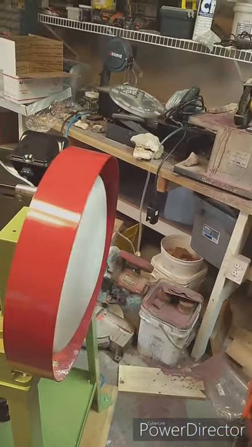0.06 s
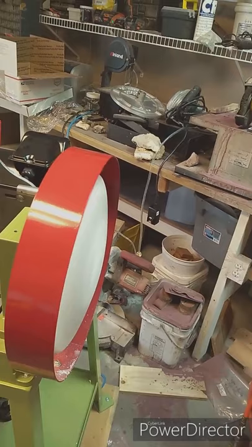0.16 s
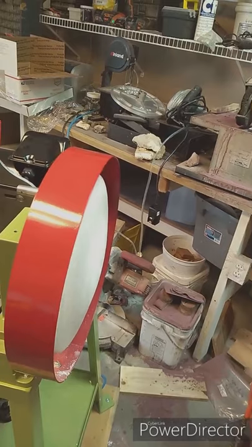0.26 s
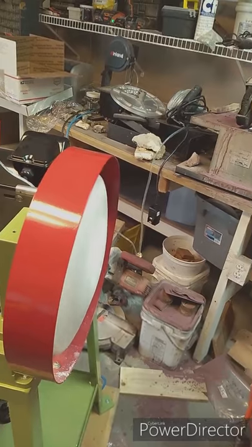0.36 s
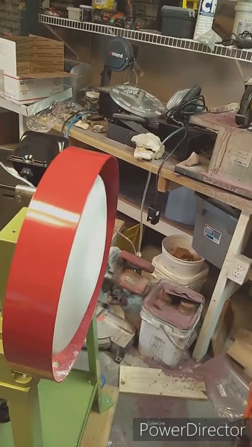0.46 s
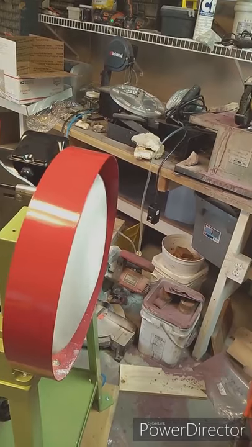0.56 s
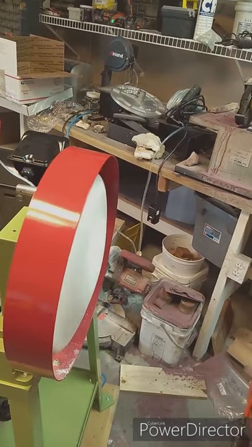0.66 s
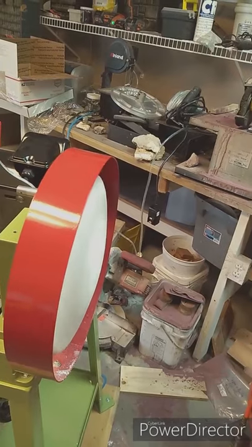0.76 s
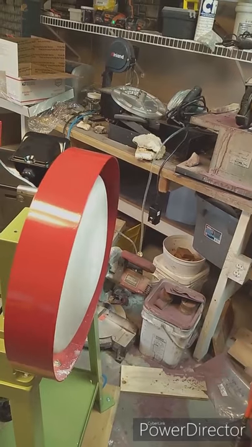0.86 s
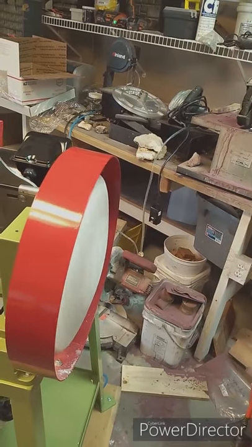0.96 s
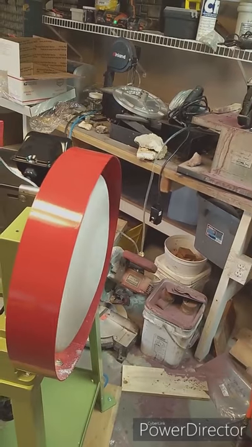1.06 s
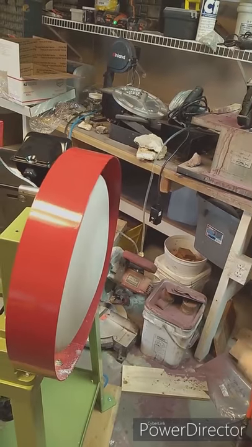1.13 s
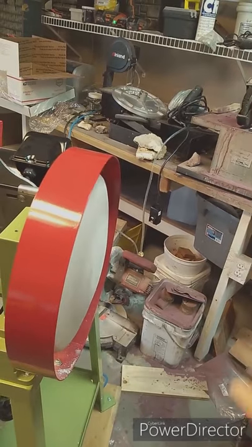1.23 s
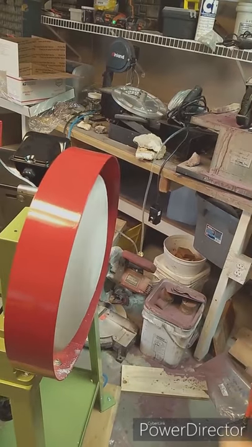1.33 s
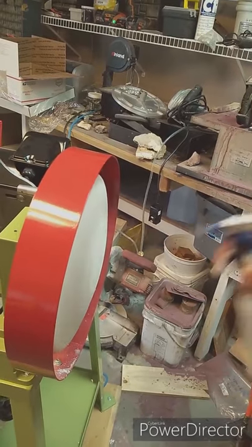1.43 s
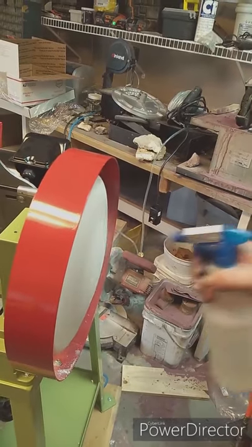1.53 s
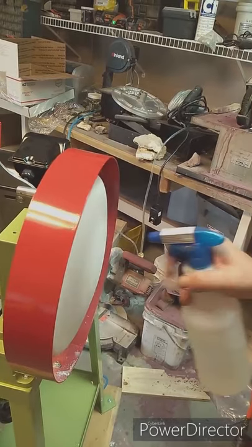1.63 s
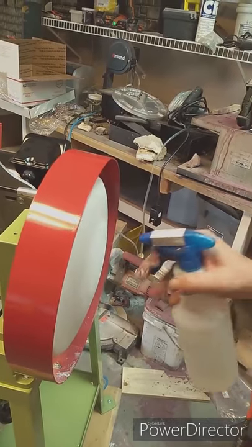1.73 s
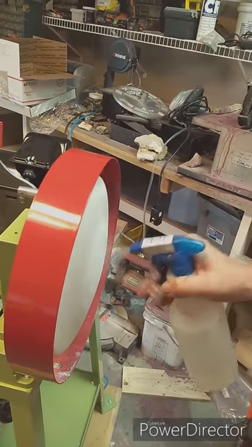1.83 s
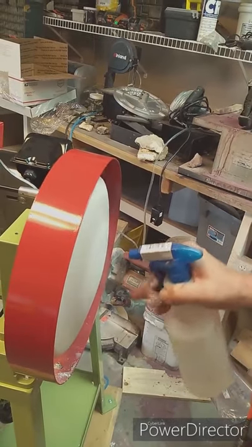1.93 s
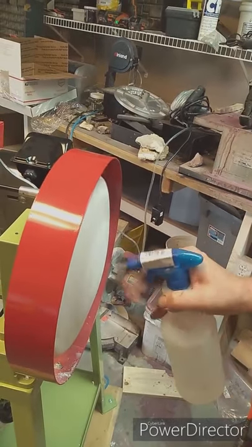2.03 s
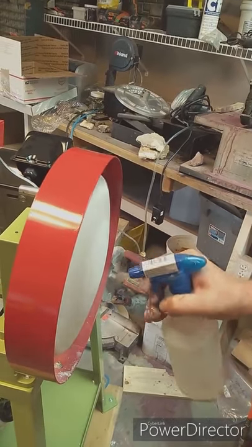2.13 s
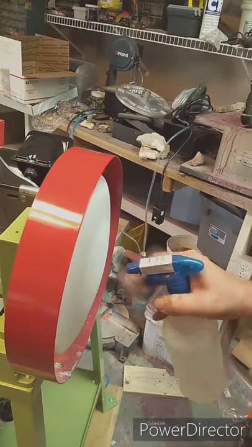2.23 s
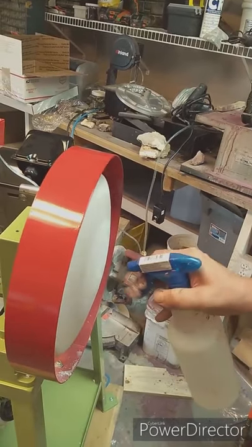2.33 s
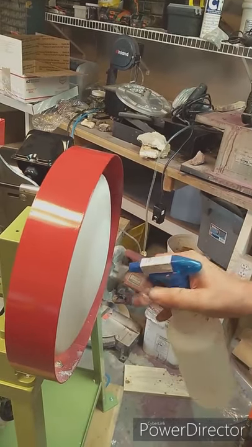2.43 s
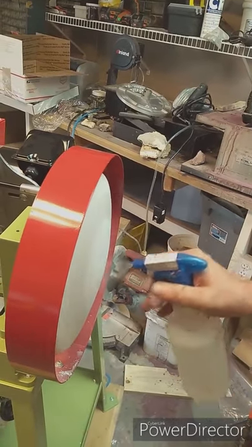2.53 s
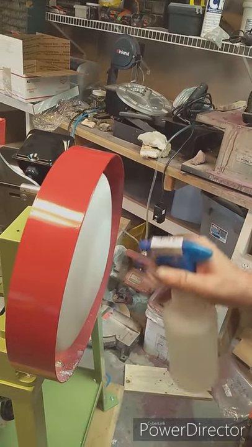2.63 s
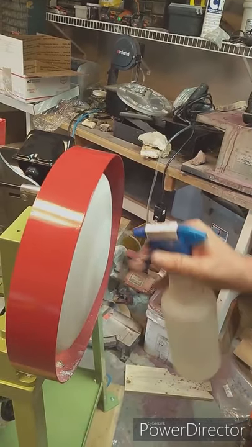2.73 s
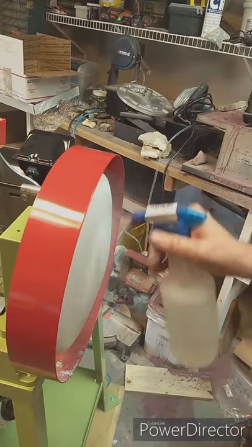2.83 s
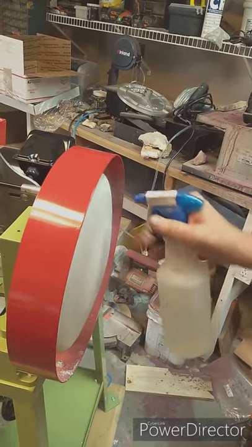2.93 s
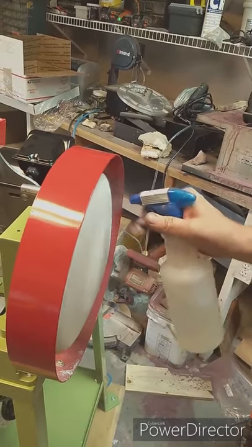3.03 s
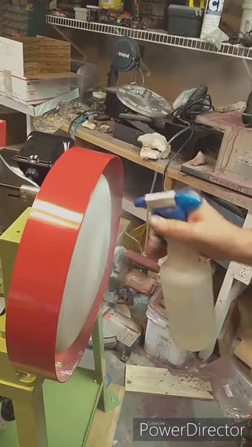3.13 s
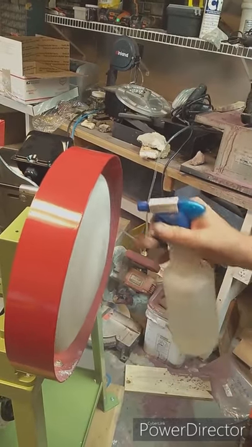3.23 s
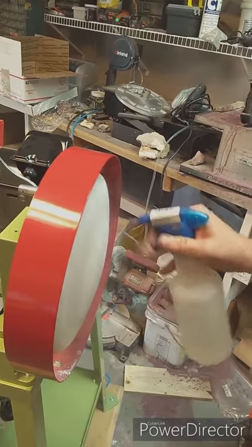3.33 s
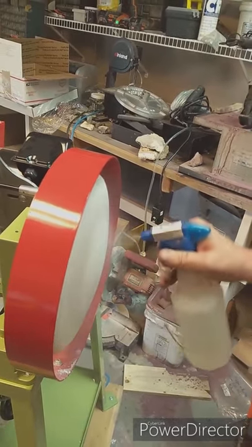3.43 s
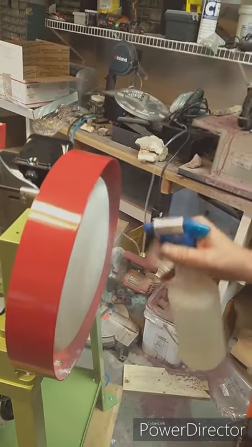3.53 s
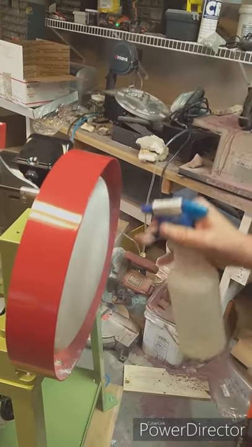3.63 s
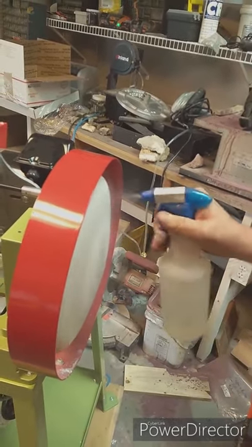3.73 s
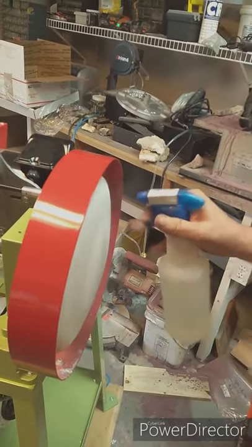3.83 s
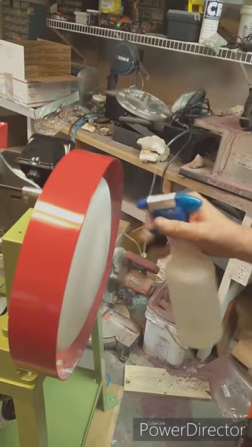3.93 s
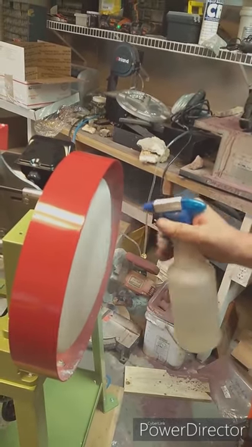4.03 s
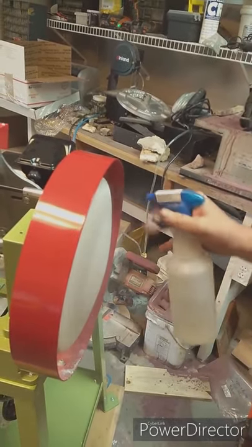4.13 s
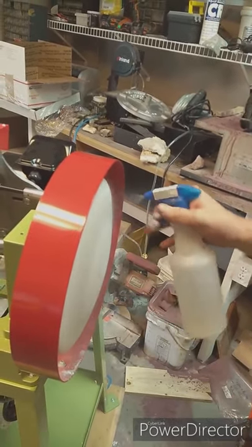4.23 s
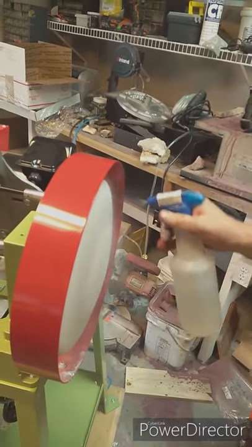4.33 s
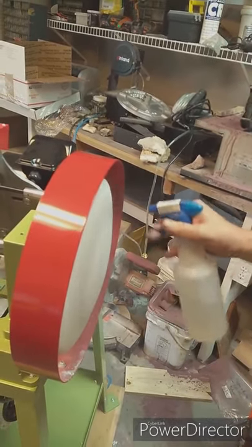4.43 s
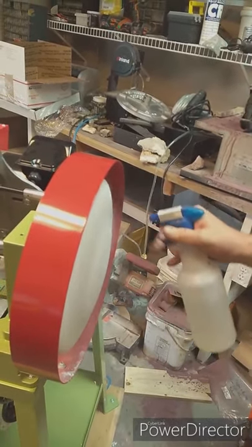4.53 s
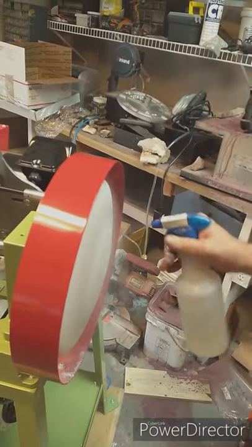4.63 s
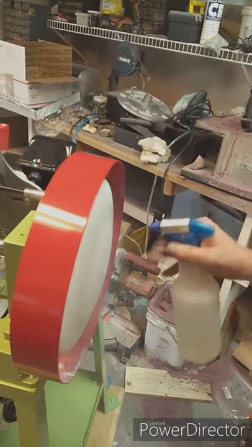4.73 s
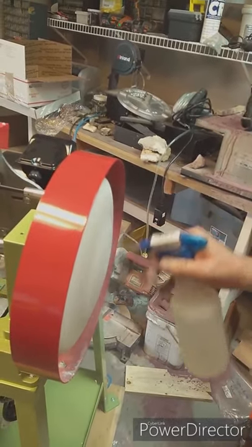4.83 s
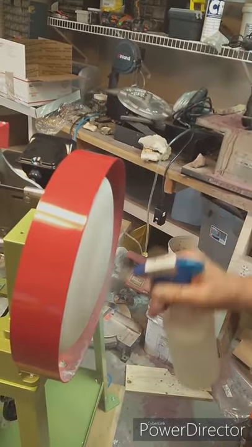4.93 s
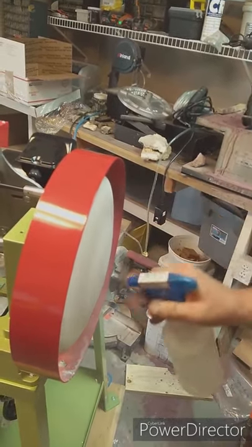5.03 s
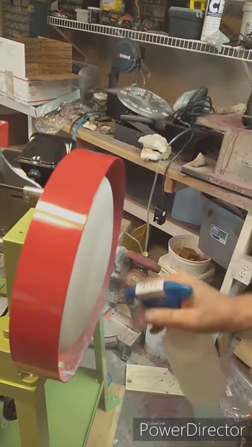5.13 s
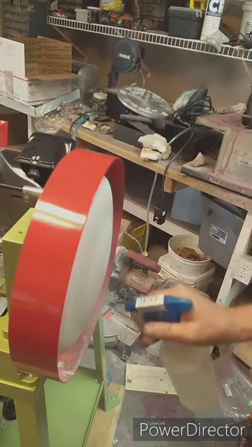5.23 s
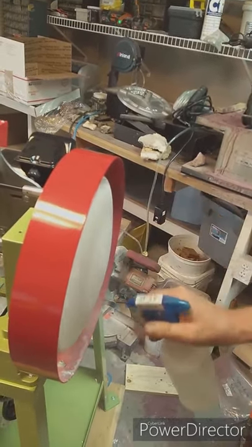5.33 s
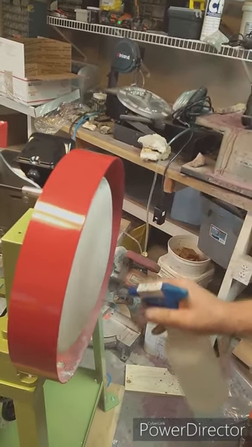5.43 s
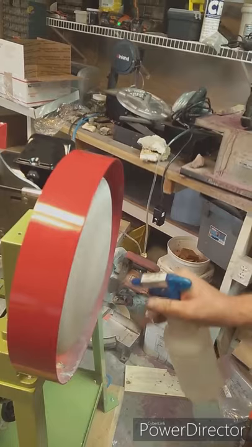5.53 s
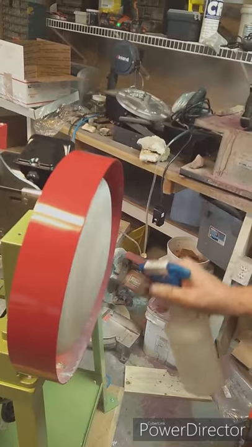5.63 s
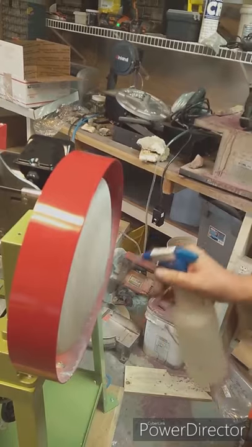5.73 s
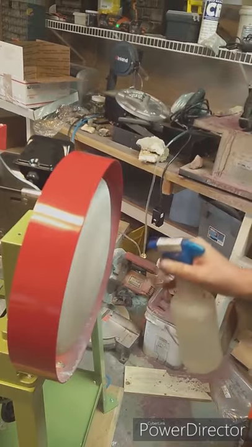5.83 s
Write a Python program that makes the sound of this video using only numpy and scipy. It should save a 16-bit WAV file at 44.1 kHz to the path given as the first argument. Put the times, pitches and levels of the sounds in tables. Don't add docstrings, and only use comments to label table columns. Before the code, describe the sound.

In a workshop, a small motor hums low and knocks softly about eleven times a second throughout. First come faint liquid sloshes and plastic rustles as a bottle is picked up; from 1.5 seconds the trigger is pumped about three times a second, each click swelling into a sharp hiss. Close stereo camera microphone, slightly grainy compressed sound.

```python
import sys
import numpy as np
from scipy import signal
from scipy.fft import rfft, irfft, dct, next_fast_len
from scipy.io import wavfile
from scipy.ndimage import uniform_filter1d, map_coordinates

SR = 44100
rng = np.random.default_rng(int(sys.argv[2]) if len(sys.argv) > 2 else 0)


def int16_out(signal):
    q = np.round(np.clip(np.atleast_2d(signal).T, -1, 1) * 32767)
    wavfile.write(sys.argv[1], SR, q.astype(np.int16))


def decibels_to_gain(level_db):
    exponent = np.asarray(level_db, float) / 20
    return 10 ** exponent


N = 258867

# (valve opens [s], time to full pressure [s], full jet [dB], opening under that [dB],
# time to lose 20 dB [s])
SQUIRTS = [(1.479, .082, -33, 25, .1), (1.845, 0.069, -31, 12, 0.06), (2.108, .118, -33, 4, .075),
           (2.525, 0.059, -36, 12.5, 0.12), (2.785, 0.079, -30.5, 12.5, .13), (3.098, .078, -32.5, 4, 0.12),
           (3.379, 0.104, -33, 20, 0.1), (3.7, 0.096, -32, 20, 0.08), (3.975, 0.102, -32.5, 12.5, 0.11),
           (4.27, 0.114, -35.5, 21.5, 0.07), (4.571, 0.113, -34.5, 23.5, 0.08),
           (4.872, 0.101, -34, 27.5, .11), (5.169, .103, -32, 18, 0.09), (5.455, 0.104, -39.5, 18, 0.11),
           (5.729, .069, -40.5, 9, 0.24)]
# (seep starts [s], seep [dB], its jet part re that [dB],
# sputter re usual [dB], mist re usual [dB])
LEADS = [(1.45, -67, 0, 0, -1), (1.796, -64, 0, 0, 1), (2.1, -60, 0, 0, 0), (2.499, -61, 0, -2, 0),
         (2.774, -62, 0, -2, 0), (3.075, -57, 0, -2, 1), (3.375, -80, 0, -4, -1), (3.674, -58, 0, -2, 0),
         (3.97, -80, 0, -4, 0), (4.249, -62, 0, 0, 0), (4.566, -80, 0, -2, 1), (4.868, -80, 0, 4, 0),
         (5.147, -63, 0, 0, 1), (5.444, -63, 0, 0, -1), (5.724, -80, 0, -4, 1.5)]
# (time [s], peak [dB])
TICKS = [(0.347, -52), (0.8804, -56), (1.438, -54), (2.076, -38), (2.09, -38), (2.742, -43), (3.0789, -45),
         (3.698, -47), (3.978, -46), (3.998, -38), (4.2516, -49), (4.269, -34), (4.8724, -47), (5.455, -45),
         (5.4675, -38)]
# (middle [s], length [s], level [dB], fizz re that [dB])
GURGLES = [(1.45, .04, -68, 4), (1.577, 0.072, -53, -22), (1.841, 0.046, -57, 4.5), (2.06, .09, -59, 10),
           (2.345, .09, -58, 6), (2.45, .08, -63, 3), (2.736, 0.037, -59.5, 0.5),
           (2.863, 0.061, -49.5, -20), (3.115, 0.049, -56.5, -19.5), (3.408, 0.054, -60, -20),
           (3.653, 0.18, -57, -8), (3.92, .08, -66, 4), (4.044, 0.099, -56, -19.5), (4.47, .08, -62, 6),
           (4.55, 0.14, -57.5, -8), (4.683, 0.096, -56, -19.5), (4.8, .07, -60, 4),
           (5.106, 0.05, -67.5, 12.5), (5.196, 0.056, -57.5, -20), (5.294, 0.13, -53.5, -20),
           (5.435, 0.15, -61, -3.5), (5.696, 0.13, -58.5, -8), (5.75, .06, -55, -19)]
# (frequency [Hz], density [dB per Hz])
JET_COLOUR = [(3800, -38), (4600, -23.5), (5000, -5), (6800, -4), (8200, 0), (9200, -5), (10800, -3.5),
              (11100, -24), (11800, -32), (12400, -53)]
# (frequency [Hz], density [dB per Hz])
MIST_COLOUR = [(10600, -37), (11300, -12.5), (12200, -10), (12800, -4.5), (14500, -5), (14900, -5.5),
               (15750, -16), (16000, -72)]
# (frequency [Hz], density [dB per Hz])
DROPS_COLOUR = [(1200, -10.5), (2000, -5), (3000, 4.5), (3600, 3), (4600, -0.5), (5200, -53)]
# (from [s], to [s], band of 375 Hz [number], level re jet [dB])
THIN_TONES = [
    (2.8, 3.06, 40, -16),
    (3.1, 3.35, 40, -16),
    (3.4, 3.52, 40, -17),
    (2.26, 2.33, 40, -13),
    (2.8, 3.06, 30, -21),
    (2.52, 2.7, 30, -23),
    (3.82, 3.92, 40, -13),
    (2.6, 2.7, 32, -22),
]
# (time [s], peak [dB], wall pitch [Hz], rattle re peak [dB])
THUMPS = [(1.08, -39, 328, -25), (1.19, -45.5, 375, 1.5), (1.36, -37.5, 342, -20), (1.562, -38.5, 1226, -1),
          (1.584, -36, 530, -13), (1.62, -44, 410, -18), (1.74, -36.5, 404, -17), (1.778, -34.5, 412, -27),
          (2.101, -45, 340, 0), (2.287, -46.5, 400, -3), (2.355, -40, 380, -8), (2.46, -39, 307, -4.5),
          (2.845, -42, 340, -2), (2.971, -39.5, 534, -16), (3.405, -41.5, 417, -11),
          (3.431, -35.5, 533, -18), (3.53, -41, 574, -5), (4.048, -37, 196, -12), (4.14, -45, 100, -5),
          (4.57, -38, 420, -15), (4.219, -47, 298, -22), (4.545, -44, 430, 6), (4.693, -45, 350, -3),
          (5.085, -38, 347, -13), (5.18, -40, 352, -1), (5.266, -35, 334, -3), (5.34, -34.5, 344, -9.5),
          (5.769, -46, 350, -1), (5.825, -38, 340, -7)]
# (time [s], peak [dB], pitch [Hz], rattle re peak [dB])
BUMPS = [
    (3.69, -46, 70, -20.5),
    (4.094, -35, 88, -16),
    (4.819, -47, 71, -11),
    (4.2, -43, 48, -30),
    (5.08, -46, 55, -30),
]
# (time [s], length [s], level [dB], pitch [Hz])
SQUEAKS = [(2.105, 0.059, -53, 1700), (2.34, 0.031, -53.5, 1700), (2.778, 0.055, -52.5, 1700),
           (3.099, 0.046, -53.5, 1590), (3.386, 0.043, -54, 1620), (3.686, 0.053, -55, 1650),
           (3.99, 0.0451, -51.5, 1710), (4.002, 0.068, -52.5, 2350), (4.262, 0.063, -54.5, 1700),
           (4.787, 0.054, -55.5, 2350), (5.163, 0.055, -61, 1923), (5.733, 0.069, -53, 1780),
           (1.54, .09, -51, 4700)]
# (time [s], swell [s], slosh [dB], brightness [dB], decay [dB per s])
SLOSHES = [(0.0, .001, -51.5, -11.5, 164), (.11, 0.018, -62.5, -25, 150), (.23, .04, -65, -3, 203),
           (.343, 0.0067, -57.5, 1, 90), (.472, 0.015, -56.5, 1.5, 145), (.52, .045, -55.5, -15, 198),
           (.635, 0.017, -61.5, -7, 85), (.853, 0.0061, -63, -8, 84), (.962, 0.016, -71.5, 9, 80),
           (1.07, 0.022, -57.5, -11, 60), (1.13, .09, -56, 2, 100), (1.32, 0.039, -65, -16, 25)]
# (frequency [Hz], density [dB per Hz])
WET_COLOUR = [(1000, -17), (2200, -1.5), (4000, -4.5), (6500, -4.5), (7600, -13), (8200, -28)]
# (frequency [Hz], density [dB per Hz])
SHEEN_COLOUR = [(7000, -23), (7700, 4.5), (10000, -5), (13000, -17), (15500, -16), (15950, -70)]
HUM_HZ = [58.5, 98.6, 120, 240, 360, 438, 987.2, 1107.2, 1227.2, 747.5, 1347, 1856, 2094.5]
# (rms [dB], left-right [dB], left lead [rad], throb [0-1])
HUM = [(-72, 1, -0.4, 0.4), (-70.5, -1, -0.5, 0.4), (-64, -0.5, 0.17, 0), (-49, 0, 0.07, 0.06),
       (-65, -1, -0.4, 0.03), (-70.5, 8, -0.5, 0.5), (-58.5, 5, -1.34, 0.44), (-52.5, 3, -1.55, 0.04),
       (-65.5, 5.5, -2, 0.64), (-83, -2, 0.29, .1), (-79.5, 6, -0.5, 0.1), (-80, 15, -2, .2),
       (-68.5, 1, -2.5, 0.18)]
# (middle [s], length [s], gain [dB])
BOOMS = [(1.75, .06, 4), (1.82, .03, 4), (2.0, .04, -8), (2.12, .04, 9), (2.31, .03, 5), (2.39, .025, 10),
         (2.467, .025, 7), (2.68, .035, 9), (2.86, .035, 7), (3.415, .045, 8), (3.8, .06, 3),
         (4.06, .025, 5), (4.165, .045, 10), (4.24, .025, 7), (4.27, .02, -10), (4.71, .04, 9),
         (4.8, .025, 5), (4.9, .04, 6), (5.0, .04, -8), (5.1, .05, 9), (5.28, .04, 9), (5.37, .03, 6),
         (5.54, .035, 7), (5.78, .025, 5), (5.84, .04, 10)]
# (frequency [Hz], level [dB], t60 [s], delay [s])
HOUSING = [
    (985, -2, .05, 0),
    (1040, 0, 0.067, 0.0012),
    (1061.4, -0.5, 0.057, 0.008),
    (1115.6, 1.5, 0.1, .012),
    (1256, -30, .06, 0.0038),
]
# (frequency [Hz], width [Hz], level [dB])
STAND = [(82.5, 12.4, -12), (192.2, 12, -4.5), (233, 24, -5.5), (343, 25, -11), (357, 9, -9),
         (407, 43, -14), (532.8, 5.3, -13.5), (577, 12, -11), (703, 22, -27), (760, 92, -35),
         (1054, 30, -27.5), (1700, 160, -31.5), (2350, 15, -24)]
# (frequency [Hz], density [dB per Hz])
AIR_COLOUR = [(20, -2.5), (60, -17), (150, -1), (300, 4), (480, -4.5), (800, -2), (1150, -4), (1450, -10.5),
              (2200, -12.5), (3800, -17.5), (8500, -20.5), (11000, -31), (14500, -32), (15950, -70)]
# (frequency [Hz], left-right likeness [-1 to 1])
ALIKE = [(40, 1), (90, 0.98), (250, 0.99), (450, 0.7), (800, 0.5), (1500, 0.083), (9000, 0.1)]
# (frequency [Hz], margin [dB])
SPARED = [(1500, 29.5), (2600, 21.5), (3500, 21), (4300, 23), (4900, 25.5), (6600, 15), (10900, 17),
          (11100, 5), (11700, 6), (12400, 18), (15300, 15)]
# (frequency [Hz], step re band rms [dB])
STEPS = [(1300, -6), (1700, 4.5), (2600, 8), (3500, 9.5), (4200, 10.5), (4800, 8.5)]

SHAFT_HZ, FIRST_KNOCK_S = 5.381, 0.136
PORT_LAG, ROOM_LAG = 12, 8
CORE_HOP, CORE_BAND = 1882, 16


def spray():
    jet_gain, mist_gain, drops_gain, aim_db = squeezes()
    t = np.arange(N) / SR
    foam = patchy(2.2)
    tearing = 0.61 * foam + 0.44 * droplets(4000, spread_db=-2.0)
    jet, mist, drops = filtered(tearing, coloured(JET_COLOUR), coloured(MIST_COLOUR), coloured(DROPS_COLOUR))
    whine = tones(slice(6, 9), lift_hz=7500)
    jet += decibels_to_gain(35.5) * whine
    for start, end, band, db in THIN_TONES:
        on = slice(round(start * SR), round(end * SR))
        fade = np.clip(np.minimum(t[on] - start, end - t[on]) / 0.015, 0, 1)
        thin_tone = np.sin(2 * np.pi * (band + 0.5) * 375 * t[on] + [[0], [1.4]])
        jet[:, on] += decibels_to_gain(db) * fade * thin_tone
    airborne = jet_gain * jet + pan(4.4) * mist_gain * mist
    landing = decibels_to_gain(4) * pan(1.3) * drops_gain * drops
    hiss = decibels_to_gain(3 + 0.55 * wobble(40)) * airborne + landing
    for s, db in TICKS:
        on = slice(round(s * SR), round(s * SR) + 500)
        decay = decibels_to_gain(db - 1.5 - 60 * (t[on] - s) / 0.03)
        hiss[:, on] += decay * (mist[:, on] + 0.5 * jet[:, on])
    return hiss * pan(aim_db - 1.1) + decibels_to_gain(-23) * whine


def squeezes():
    t = np.arange(N) / SR
    jet, mist, drops = np.zeros((3, N))
    aim_db = 0.7 + 0.13 * t
    for squirt, lead in zip(SQUIRTS, LEADS):
        s, rise, db, under_db, fall = squirt
        seeps, seep_db, seep_jet_db, sputter_db, mist_db = lead
        on = slice(round(seeps * SR), round((s + 0.57) * SR))
        since = t[on] - s
        late = np.clip(since - rise, 0, 1)
        valve = np.clip(since / 0.006 + 0.5, 0, 1)
        lost_db = 20 * (late / fall) ** 1.59
        shape_db = -under_db * np.clip(1 - since / rise, 0, 1) ** 1.53 - lost_db
        dribble = decibels_to_gain(db - 26.5 - 92 * late)
        flow = valve * (decibels_to_gain(db + shape_db) + dribble)
        seep = (1 - valve) * decibels_to_gain(seep_db + 120 * (t[on] - seeps).clip(0, 0.06))
        opening_db = 0.4 * (db - under_db + 48)
        sputter = valve * decibels_to_gain(-47 + sputter_db + opening_db - 20 * (since / 0.096) ** 2)
        fine_db = -6 + mist_db - 0.5 * (db + 33) - 0.21 * np.minimum(lost_db, 30)
        jet[on] += flow + decibels_to_gain(seep_jet_db) * seep
        mist[on] += np.hypot(flow * decibels_to_gain(fine_db), sputter) + seep
        drops[on] += valve * decibels_to_gain(db - 23.5 + 0.7 * shape_db)
        aim_db[on] -= 1.5 * valve * np.exp(-abs(since) / 0.021)
    for s, length, db, fizz_db in GURGLES:
        on = slice(round((s - length) * SR), round((s + length) * SR))
        swell = decibels_to_gain(db) * np.cos(np.pi / 2 * (t[on] - s) / length) ** 2
        drops[on] = np.hypot(drops[on], swell)
        jet[on] = np.hypot(jet[on], decibels_to_gain(fizz_db) * swell)
        mist[on] = np.hypot(mist[on], decibels_to_gain(1.5 * fizz_db - 10.5) * swell)
    return jet, mist, drops, aim_db


def droplets(per_second, spread_db):
    size = rng.standard_normal(N) * decibels_to_gain(spread_db * rng.exponential(size=N))
    clicks = (rng.random(N) < per_second / SR) * size
    bounce = rng.standard_normal((2, 160)) * decibels_to_gain(-np.arange(160) * 0.25)
    left = np.roll(unit(0.7 * bounce[0] + bounce[1]), PORT_LAG)
    bounce = np.array([left, unit(bounce[1])])
    return unit(signal.fftconvolve(clicks[None], bounce, axes=1)[:, 12:N + 12])


def trigger():
    out, t = np.zeros((2, N + SR)), np.arange(SR // 8) / SR
    hollow = signal.butter(2, [300, 1300], "band", fs=SR, output="sos")
    for s, db, hz, rattle_db in THUMPS + BUMPS:
        wall = np.sin(2 * np.pi * hz * t) * decibels_to_gain(-60 * t / (0.069 + 12 / hz))
        loose = rng.standard_normal(len(t)) + 0.5 * rng.standard_normal((2, len(t)))
        rattle_gain = decibels_to_gain(rattle_db + 16.5 - 60 * t / 0.22) * (1 - np.exp(-t / 0.032))
        rattle = signal.sosfilt(hollow, loose) * rattle_gain
        start = round(s * SR)
        out[:, start:start + len(t)] += decibels_to_gain(db) * (1 - np.exp(-t / 0.0038)) * (wall + rattle)
    for s, length, db, hz in SQUEAKS:
        start, size = round(s * SR), round(length * SR)
        narrow = signal.butter(2, [hz * 0.933, hz * 1.11], "band", fs=SR, output="sos")
        rub = signal.sosfilt(narrow, rng.standard_normal((2, size)))
        out[:, start:start + size] += decibels_to_gain(db + 3) * np.hanning(size) * unit(rub)
    return out[:, :N]


def slosh():
    t, body, sheen = np.arange(N) / SR, np.zeros(N), np.zeros(N)
    for s, swell, db, bright_db, dies in SLOSHES:
        decay = decibels_to_gain(db - dies * np.clip(t - s - swell, 0, None))
        shake = np.clip((t - s) / swell, 0, 1) ** 2 * decay
        body = np.hypot(body, shake)
        sheen = np.hypot(sheen, decibels_to_gain(bright_db) * shake)
    gate = np.clip((1.46 - t) / 0.02, 0, 1)
    rustle = 0.94 * patchy(3.6) + 0.51 * droplets(1200, spread_db=1.2)
    wet, fine = filtered(rustle, coloured(WET_COLOUR), coloured(SHEEN_COLOUR))
    return gate * decibels_to_gain(5.5) * (body * wet + sheen * fine)


def motor():
    def stand(hz):
        return np.sqrt(sum(decibels_to_gain(db) ** 2 / (1 + (2 * (hz - c) / width) ** 4) for c, width, db in STAND))

    shaken = decibels_to_gain(-50.5 + 1.3 * wobble(5)) * rush(stand, patchy_db=4.0)
    air = decibels_to_gain(-52 + 0.57 * wobble(1.98)) * rush(coloured(AIR_COLOUR), patchy_db=2.75)
    return tones(slice(None), lift_hz=0) + knocks() + shaken + air


def tones(chosen, lift_hz):
    t, out = np.arange(N) / SR, np.zeros((2, N))
    turn = 2 * np.pi * SHAFT_HZ * (t - FIRST_KNOCK_S - 0.025)
    beat = 0.27 * np.cos(turn) + 0.86 * np.cos(2 * turn) + 0.39 * np.cos(3 * turn)
    waver = wobble(12)
    for hz, (db, pan_db, lead, throb) in list(zip(HUM_HZ, HUM))[chosen]:
        waver = np.roll(waver, N // 7)
        swell = (1 + throb * beat) * np.exp(0.11 * waver)
        if hz == HUM_HZ[3]:
            swell = swell * booms()
        phase = 2 * np.pi * ((hz + lift_hz) * t + rng.random()) + 0.18 * waver[::-1]
        port_phase = phase + np.array([[0.5 * lead], [-0.5 * lead]])
        out += np.sqrt(2) * decibels_to_gain(db) * pan(pan_db) * swell * np.cos(port_phase)
    return out


def booms():
    t, db = np.arange(0, N + 64, 64) / SR, 0
    for s, length, swell_db in BOOMS:
        db = db + swell_db * np.exp(-2 * ((t - s) / length) ** 2)
    return np.interp(np.arange(N) / SR, t, decibels_to_gain(db))


def knocks():
    half_turns = np.arange(int(2 * SHAFT_HZ * N / SR) - 2)
    soft = half_turns % 2
    s = FIRST_KNOCK_S + half_turns / SHAFT_HZ / 2 + 0.00572 * soft
    s = s + rng.normal(0, 0.002006, len(s))
    blows, t = np.zeros(N), np.arange(SR // 8) / SR
    blows[(s * SR).astype(int)] = decibels_to_gain(-40.5 - 7.5 * soft - 0.62 * s + rng.normal(0, 1.3, len(s)))
    ring = np.zeros((2, len(t)))
    for hz, db, t60, late in HOUSING:
        onset = 1 - np.exp(-np.clip(t - late, 0, 1) / 0.0041)
        mode = np.sin(2 * np.pi * hz * t - [[0], [-1.5]])
        ring += decibels_to_gain(db - 60 * (t - late) / t60) * onset * mode
    return signal.fftconvolve(blows[None], ring * pan(3.6), axes=1)[:, :N]


def rush(gain, patchy_db):
    def mid_side(hz):
        turn = np.arccos(np.clip(along(ALIKE, hz), -1, 1)) / 2
        return gain(hz) * np.array([np.cos(turn), np.sin(turn)])

    mid, side = filtered(patchy(patchy_db), mid_side)[0]
    return np.array([np.roll(mid + side, ROOM_LAG), mid - side]) / np.sqrt(2)


def patchy(depth_db):
    z = rng.standard_normal((2, 257, N // 256 + 3, 2)).view(complex)[..., 0]
    field = uniform_filter1d(rng.standard_normal(z.shape[1:]), size=5, axis=0)
    field = uniform_filter1d(field, size=6, axis=1)
    noise = signal.istft(z * decibels_to_gain(depth_db * unit(field)), nperseg=512, window="cosine")[1]
    return unit(noise[:, :N])


def filtered(x, *responses):
    m = next_fast_len(N)
    spectrum, hz = rfft(x, m), np.fft.rfftfreq(m, 1 / SR)
    return [unit(irfft(spectrum * response(hz), m)[..., :N]) for response in responses]


def coloured(spectrum):
    return lambda hz: decibels_to_gain(along(spectrum, hz))


def along(points, hz):
    f, v = np.transpose(points)
    return np.interp(np.log(hz + 1), np.log(f + 1), v)


def wobble(rate):
    coarse_time = np.arange(0, N + 64, 64)
    knots = rng.standard_normal(int(N * rate / SR) + 5)
    return np.interp(np.arange(N), coarse_time, map_coordinates(knots, [coarse_time * rate / SR]))


def pan(db):
    half = np.atleast_1d(db) / 2
    return decibels_to_gain(np.array([half, -half]))


def unit(x):
    return x / np.sqrt(np.mean(x ** 2) + 1e-20)


def starved(x):
    hz, _, z = signal.stft(x, SR, nperseg=2048, window="cosine")
    power = abs(z) ** 2
    band = uniform_filter1d(power, size=10, axis=1)[:, 5::10].mean(0) + 1e-20
    band_db, band_hz = 10 * np.log10(band), hz[5::10, None]
    luck = uniform_filter1d(rng.standard_normal(band.shape), size=4, axis=1)
    luck_db = 15 * uniform_filter1d(luck, size=2, axis=0)
    loud_db = band_db[24:].max(0)
    floor_db = loud_db + 0.45 * (loud_db - loud_db.max()) + 1.5 - along(SPARED, band_hz)
    risk_db = 7.5 - 5 * np.exp(-((band_hz - 4000) / 1000) ** 2)
    floor_db = np.where(band_hz > 1650, np.maximum(floor_db, band_db - risk_db), floor_db)
    kept = 1 / (1 + np.exp(np.clip((floor_db - band_db - luck_db) / 0.16, -30, 30)))
    row = np.minimum(np.arange(len(hz)) // 10, len(band) - 1)
    strong = np.where(hz[:, None] > 4900, 2.3 * power / (power + 2.4 * band[row]), 1)
    gate = np.maximum(kept[row], np.where(hz[:, None] > 4400, 1e-3, 1))
    return signal.istft(z * strong * gate, SR, nperseg=2048, window="cosine")[1][:, :N]


def unsmeared(thinned, x):
    def level(v):
        return np.sqrt(abs(uniform_filter1d(v ** 2, size=180, axis=1)) + 1e-16)

    top = signal.butter(6, 5000, "high", fs=SR, output="sos")
    was, now = signal.sosfiltfilt(top, x), signal.sosfiltfilt(top, thinned)
    return thinned - now * (1 - np.minimum(1, 1.3 * level(was) / level(now)))


def coarse(x):
    hop, half = CORE_HOP, CORE_HOP // 2
    window = np.sin(np.pi * (np.arange(2 * hop) + 0.5) / (2 * hop))
    blocks = np.pad(x, [(0, 0), (hop, 2 * hop - N % hop)]).reshape(2, -1, hop)
    lapped = np.concatenate([blocks[:, :-1], blocks[:, 1:]], 2) * window
    a, b, c, d = np.split(lapped, 4, axis=2)
    folded = np.concatenate([-c[..., ::-1] - d, a - b[..., ::-1]], 2)
    lines = dct(folded, type=4, norm="ortho")
    bands = np.arange(7, 26)
    span = slice(7 * CORE_BAND, 26 * CORE_BAND)
    core = lines[..., span].reshape(*lines.shape[:2], len(bands), CORE_BAND)
    near = np.sqrt(abs(uniform_filter1d((core ** 2).mean((0, 3)), size=3, axis=1)) + 1e-20)
    treble_db = 10 * np.log10((lines[..., 450:900] ** 2).mean((0, 2)) + 1e-20)
    luck_db = 8 * uniform_filter1d(rng.standard_normal(near.shape), size=2, axis=0)
    hunger_db = 0.1 * (treble_db - treble_db.max() + 12)[:, None] + luck_db
    band_hz = (bands + 0.5) * CORE_BAND * SR / 2 / hop
    step = (near * decibels_to_gain(along(STEPS, band_hz) + hunger_db))[..., None]
    rounded = np.sign(core) * step * np.floor(abs(core) / step + 0.4)
    error = np.zeros_like(lines)
    error[..., span] = (rounded - core).reshape(*lines.shape[:2], -1)
    back = dct(error, type=4, norm="ortho")
    p, q = back[..., :half], back[..., half:]
    frames = np.concatenate([q, -q[..., ::-1], -p[..., ::-1], -p], 2) * window
    return x + (frames[:, :-1, hop:] + frames[:, 1:, :hop]).reshape(2, -1)[:, :N]


def scene():
    return spray() + trigger() + slosh() + motor()


def top_cut(x):
    return signal.sosfilt(signal.butter(12, 16970, fs=SR, output="sos"), x)


def record(dry):
    thinned = starved(dry)
    sharp = unsmeared(thinned, dry)
    mix = coarse(sharp)
    return top_cut(mix)


dry = scene()
out = record(dry)
int16_out(out)
```